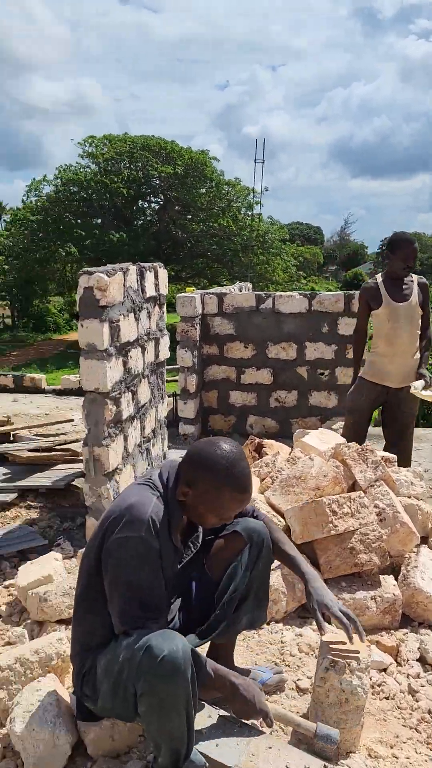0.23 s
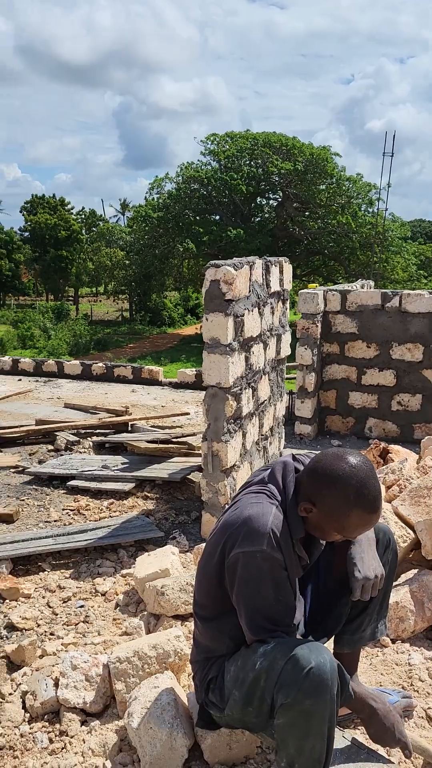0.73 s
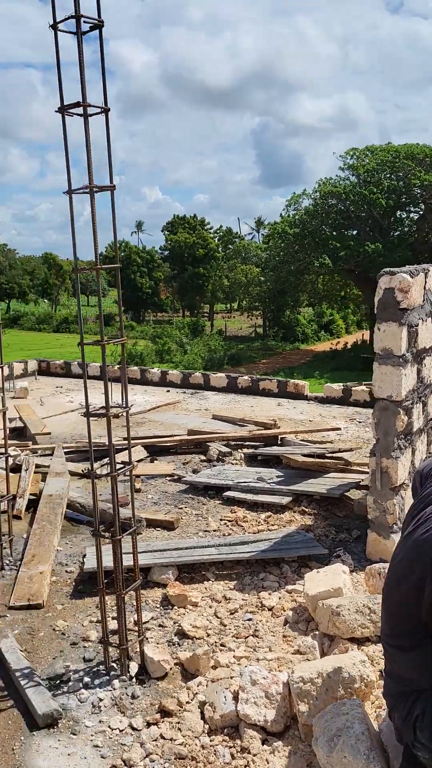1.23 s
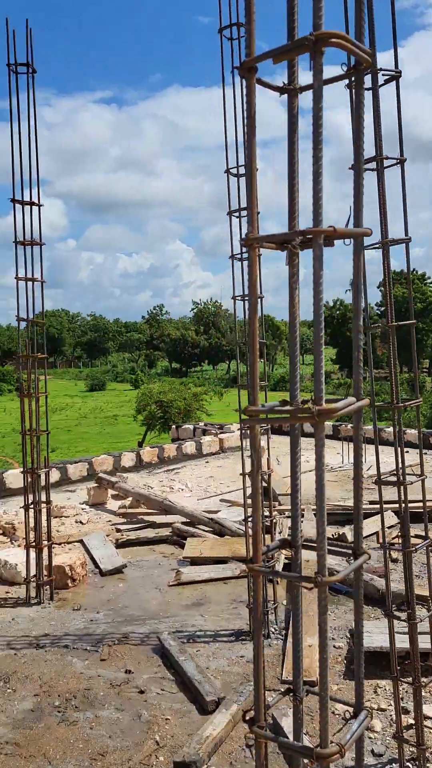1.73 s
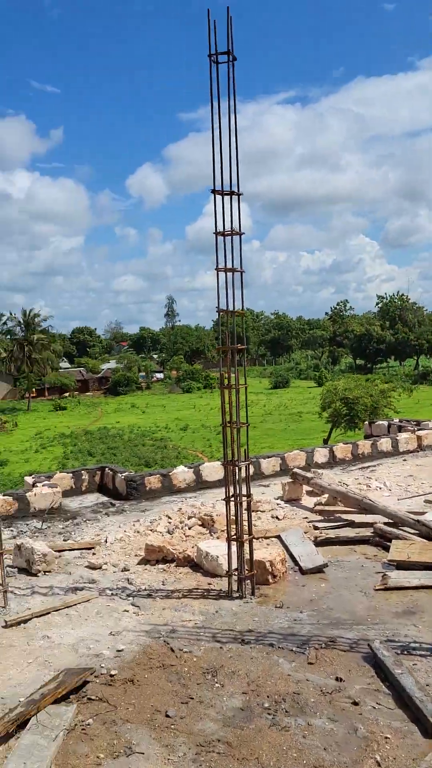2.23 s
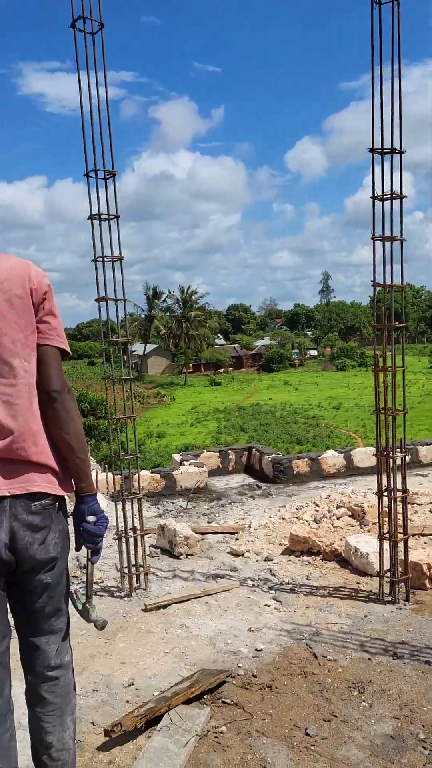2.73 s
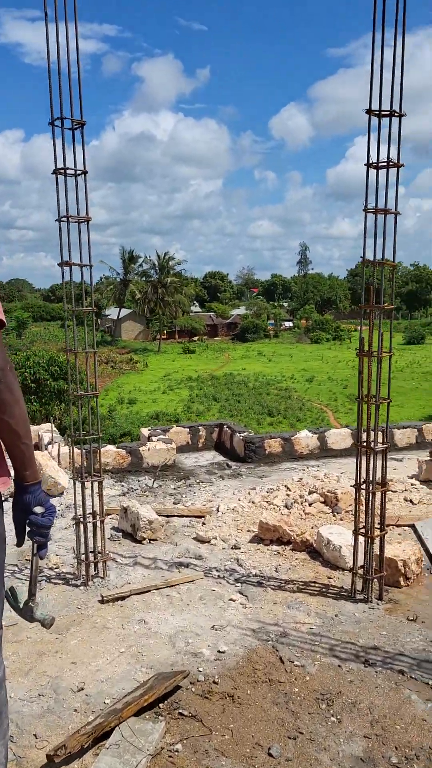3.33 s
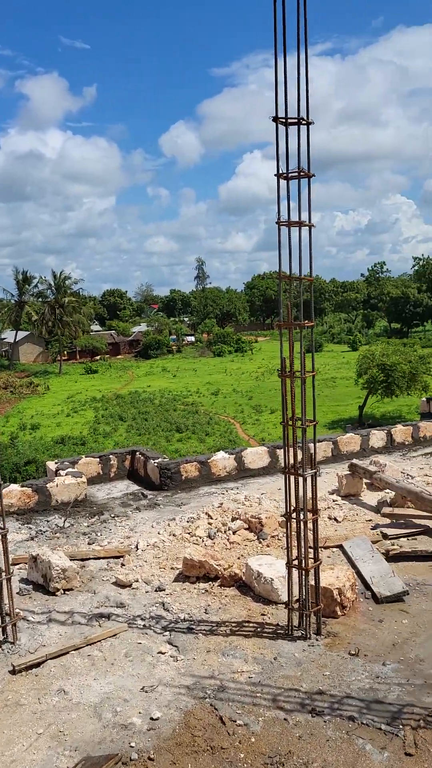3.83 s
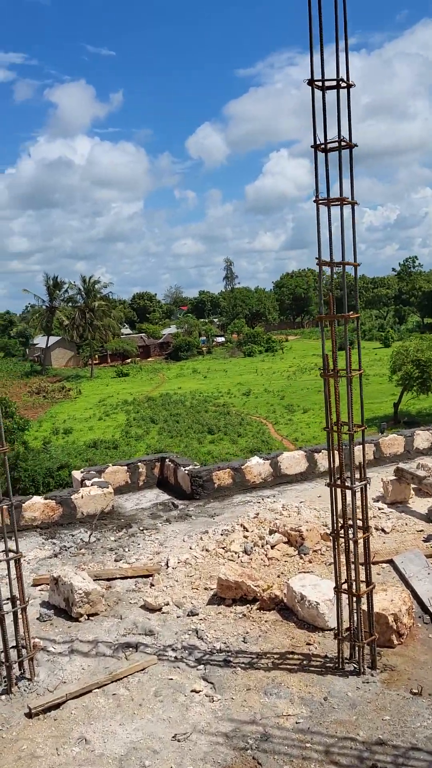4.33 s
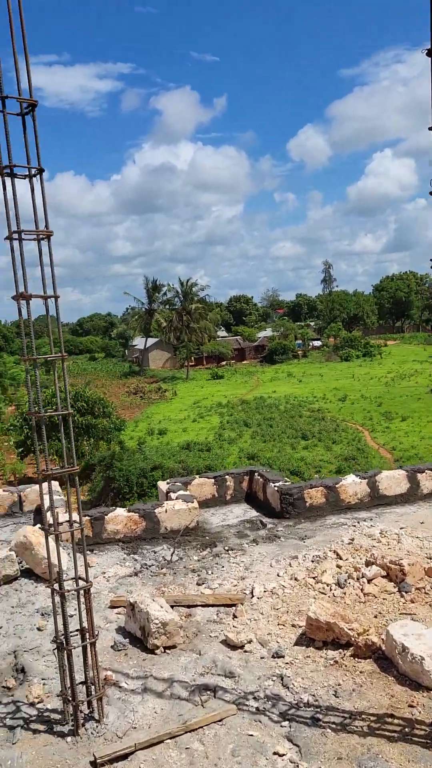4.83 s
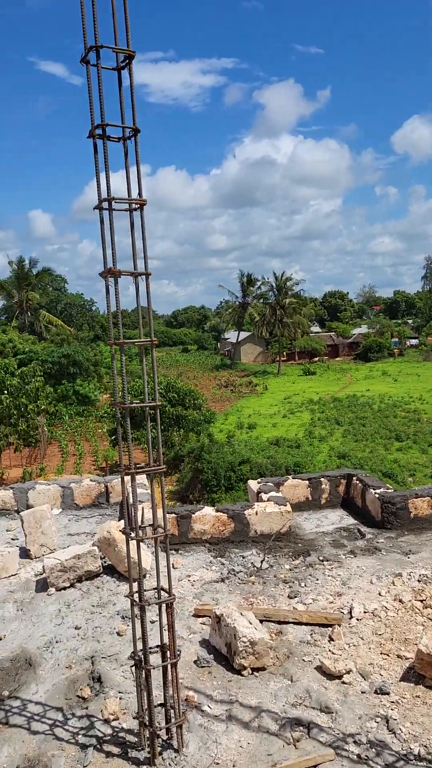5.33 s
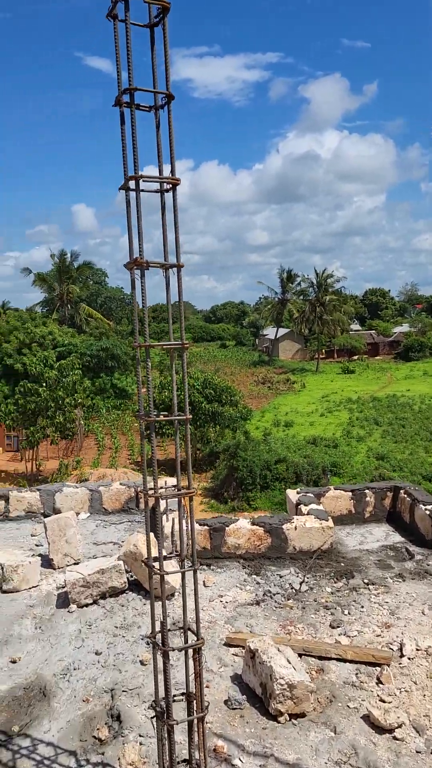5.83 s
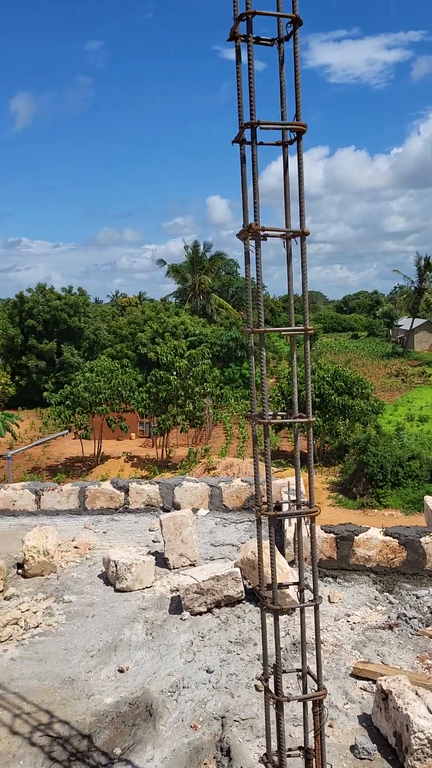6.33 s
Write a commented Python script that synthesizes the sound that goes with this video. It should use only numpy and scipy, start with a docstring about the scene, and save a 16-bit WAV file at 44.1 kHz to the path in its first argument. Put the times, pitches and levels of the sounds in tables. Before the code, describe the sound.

At an open-air building site, heard close and dry through a handheld stereo microphone, a steel clink at 0.1 s joins a hoarse blade rasp over gritty concrete. The scrape weakens, then catches sharply at 0.45 s and squeals in thin, wavering high tones that fade by about 1.4 s. Low handling bumps swell toward 1.75 s, where steel grazes the block with a thud; a hard, woody-hollow clatter of knocks follows at 2.0 s. Steady hammer blows land at about 2.46, 3.07, 3.72, 4.34, 5.53 and 6.13 s: bright cracks or duller clacks, crunching stone and a short low thud near 320 Hz. Around 4.9 s the rhythm skips a beat. Between blows, light steel clinks at 2.6, 3.4, 4.0, 4.7 and 5.3 s and tiny chips tick down. Faint rustle and rumble continue; a far rooster barely begins at 6.5 s.

```python
"""A hammer chips a soft stone block on an open building site: noise cracks and crunches, damped
modes ring the block and thud it on the slab, and chips tick down as short resonant noises.
Between blows steel clinks and small knocks tick; early on a steel blade scrapes and squeals over concrete.
The recorder shifts in the hand with low rumble, bumps and flutter, the site rustles, and at the end
a far rooster, made of a few harmonics, starts to crow."""
import sys
import numpy as np
from scipy import signal
from scipy.fft import rfft, irfft
from scipy.io import wavfile
from scipy.ndimage import uniform_filter1d, minimum_filter1d

SR = 44100
rng = np.random.default_rng(int(sys.argv[2]) if len(sys.argv) > 2 else 0)


def dump_mix(stems):
    """Bounce the given channels to the path in sys.argv[1] as a 16-bit WAV at rate SR."""
    frames = np.atleast_2d(stems).T  # one column per channel
    limited = np.clip(frames, -1, 1)  # hard clip at full scale
    pcm = np.round(limited * 32767).astype(np.int16)
    wavfile.write(sys.argv[1], SR, pcm)


N = 290619
TIME_S = np.arange(N) / SR
AGE_S = np.arange(SR // 2) / SR  # time since a hit
HIT_SIZE = len(AGE_S)
PORT_LAG_S = .00031  # the work lies to the right, so the left port hears it later
LOWPASS_HZ = 15900

# Levels in the tables are relative; the sources may add offsets and random spread.
# Recorder shifting in the hand. Each row: time in seconds, rumble level in dB.
HANDLING = [(0, -46), (.7, -46.5), (.92, -60), (1.2, -41.5), (1.5, -44), (1.85, -37.5), (1.95, -49),
            (2.15, -41.5), (2.4, -53), (3.12, -41.5), (3.28, -51.5), (3.62, -59.5), (4.25, -39.5),
            (4.9, -50), (5.15, -65), (5.45, -49.5), (6.2, -56), (6.45, -64.5)]
# Single bumps on top of it. Each row: peak time in seconds, half width in seconds, rumble level in dB.
BUMPS = [(.06, 0.021, -38.5), (1.131, 0.036, -39), (1.475, 0.014, -36.5), (1.584, 0.022, -31),
         (1.681, 0.038, -28.5), (1.75, 0.032, -23), (2.824, 0.028, -33.5), (2.97, 0.033, -39),
         (3.438, 0.045, -46.5), (3.789, 0.052, -42), (5.369, 0.032, -39.5), (6.031, 0.069, -43.5)]
# Spectrum of the handling rumble. Each row: frequency in Hz, level in dB.
RUMBLE_SPECTRUM = [(15, -22.5), (35, -7.5), (62, 3), (110, -2), (200, -15.5), (400, -43.5), (1000, -61)]
# Spectrum of the handling flutter. Each row: frequency in Hz, level in dB.
FLUTTER_SPECTRUM = [(60, -6), (150, -1), (300, 3), (500, -7.5), (900, -22), (2500, -56)]

# Faint rustle of the site. Each row: time in seconds, level in dB.
SITE_LEVEL = [(1.5, -61.5), (1.9, -62), (2.1, -72), (2.42, -55.5), (2.7, -65.5), (3.5, -67), (4.1, -70.5),
              (4.5, -63.5), (5.0, -74), (5.45, -66), (5.8, -73), (6.25, -61.5), (6.59, -71.5)]
# Spectrum of the rustle. Each row: frequency in Hz, level in dB.
SITE_SPECTRUM = [(100, 4.5), (500, 11.5), (1000, 6), (1700, 8.5), (2800, -0.5), (5000, -0.5), (8500, -4.5),
                 (11000, -10), (15000, -11)]

# Far rooster. Each row: time in seconds, fundamental in Hz, level in dB.
CROW = [(6.48, 490, -99.5), (6.515, 472, -58), (6.555, 509.4, -59.5), (6.59, 500, -59)]
# Its throat resonance. Each row: harmonic number, level in dB.
CROW_HARMONICS = [(2, -2), (3, 4), (4, -3)]

# Blade on concrete. Each row: time in seconds, level in dB.
SCRAPE_LEVEL = [(0.0, -28.5), (0.04, -33), (0.182, -40), (0.36, -46), (0.462, -33.5), (0.6, -36.5),
                (0.864, -37), (1.216, -44), (1.35, -43), (1.412, -53), (1.6, -58.5)]
# Spectrum of the scrape. Each row: frequency in Hz, level in dB.
SCRAPE_SPECTRUM = [(300, -21), (600, -16.5), (1200, -18), (2000, 0), (2800, -3.5), (4400, 2), (5500, -3),
                   (8500, -1), (10500, -9), (13000, -4.5), (15000, 5.5), (16000, -5)]
# The blade catches on grit. Each row: start in seconds, level in dB, t60 in seconds.
CATCHES = [(0.432, -20.5, 0.36), (0.465, -20, 0.047), (0.521, -23.5, 0.054), (0.6, -25, 0.21),
           (.992, -33.5, 0.12), (1.319, -34, 0.045)]
# Resonances of the blade taking hold. Each row: peak time in seconds, pitch at the peak in Hz,
# level in dB, t60 in seconds.
SQUEALS = [(.3, 2360, -51, 0.52), (.44, 2730, -38.5, 1), (.45, 3410, -30, 0.77), (.47, 4050, -37, 1.7),
           (.47, 4500, -27, 0.29), (.61, 2455, -30, 0.53), (.63, 4470, -34.5, 0.29), (.64, 3930, -29, 0.22),
           (0.659, 2910, -31, 0.23), (0.759, 3460, -46, 3.3), (0.821, 2543, -36, 1.9), (.9, 3060, -43, 3.9)]
# Bending of the blade. Each row: time in seconds, rise of its resonances in Hz.
BEND = [(.3, 0.5), (.41, 2), (.46, 59.5), (.55, 56), (.62, 99), (.72, 141), (.88, 190.5), (1.03, 130),
        (1.15, 116), (1.35, 21)]
# Lower, hoarse rasp as the blade first drags. Each row: time in seconds, pitch in Hz, level in dB.
RASP = [(0, 1768, -42.5), (.035, 1620, -35.5), (.07, 1297, -40), (.11, 1500, -49.5), (.16, 1665, -38.5),
        (.21, 1590, -50.5)]

# Small knocks and ticks; the rows at 2.465, 4.337 and 6.134 s are the sharp upper-mid snap of hammer blows.
# Each row: start in seconds, level in dB, centre frequency in Hz, t60 in seconds.
KNOCKS = [(0.276, -23, 12800, 0.029), (0.341, -34, 1533, 0.024), (1.158, -33, 8360, 0.015),
          (1.216, -33.5, 8070, 0.01), (1.818, -28, 2000, .04), (1.978, -25.5, 3350, 0.039),
          (1.978, -28, 1060, 0.23), (1.996, -14, 930, 0.032), (2.005, -20.5, 540, 0.12),
          (2.008, -9, 1250, 0.053), (2.023, -20.5, 1080, 0.093), (2.095, -35.5, 1440, 0.012),
          (2.17, -41.5, 1045, 0.2), (2.244, -35, 1180, 0.048), (2.262, -33.5, 800, 0.12),
          (2.3, -36.5, 420, .2), (2.465, -13.5, 3480, 0.037), (2.87, -35.5, 1540, 0.0165),
          (3.778, -28.5, 3300, 0.037), (3.998, -38.5, 1600, 0.042), (4.337, -18, 3500, 0.033),
          (4.476, -38, 1515, 0.018), (6.134, -17, 3200, 0.018)]

# Steel on stone. Each row: start in seconds, contact level in dB, contact t60 in seconds, ring level
# in dB, edge pitch in Hz, edge level in dB, edge t60 in seconds, left minus right in dB.
CLINKS = [(0.082, -14.5, 0.045, -32, 3600, -16.5, 0.087, -6.5), (0.103, -26, 0.1, -43, 1300, -27, .1, 2),
          (1.777, -23, 0.055, -60, 7540, -20.5, 0.082, -6), (1.789, -21.5, 0.018, -60, 7650, -45, .1, -10),
          (2.613, -27.5, 0.14, -36, 4850, -17, 0.15, -3.5),
          (3.361, -26, 0.096, -36.5, 4984, -25.5, 0.1, -2), (4.028, -29.5, 0.063, -58, 7500, -48, .12, -6),
          (4.672, -31.5, 0.073, -51.5, 3450, -30, 0.096, -3),
          (5.329, -34.5, 0.08, -53.5, 3297, -36.5, 0.097, 3), (5.393, -48.5, 0.056, -72, 7500, -59, .1, -7),
          (5.532, -50, 0.038, -58, 4850, -34, 0.074, 0), (5.536, -53, 0.047, -62, 5940, -47.5, 0.26, -14),
          (5.992, -42, 0.16, -61, 4900, -40, 0.15, -6), (6.023, -37.5, 0.095, -60, 7740, -55, .12, 8)]
# Modes of the hammer head. Each row: frequency in Hz, level in dB, t60 in seconds.
STEEL_MODES = [(1863, 6, 0.077), (2590, -5, 0.057), (3460, -23.5, .11), (4960, 0.5, 0.09), (6035, -18, .15),
               (7400, 1, 0.118)]
# Spectrum of gritty contact. Each row: frequency in Hz, level in dB.
CONTACT_SPECTRUM = [(200, -2), (650, 2.5), (1300, 4.5), (3000, -4), (5000, -7), (7500, -2), (11000, -15.5),
                    (15000, -15)]

# Blows and rebounds of the block. Each row: start in seconds, crack level in dB, crunch level in dB,
# thud level in dB, main thud pitch in Hz, thud t60 in seconds, dull clack level in dB.
BLOWS = [(1.778, -23.5, -32, -11.5, 328, 0.105, -21.5), (1.816, -26, -37, -21.5, 349, 0.16, -25),
         (2.464, -13, -21, -9.5, 338.6, 0.15, -17.5), (3.073, -11.5, -19.5, -12, 318.7, 0.185, -18),
         (3.143, -36.5, -72, -15, 289, 0.12, -35), (3.721, -3, -21, -18.5, 319.7, 0.13, -19),
         (3.778, -42.5, -38, -27.5, 290, 0.28, -30), (4.335, -37, -31.5, -7.5, 318, 0.15, -11),
         (5.532, -29, -30.5, -16.5, 305, 0.21, -23.5), (6.133, -13, -22.5, -12, 314.2, 0.28, -13.5),
         (6.24, -58, -56.5, -25, 319, 0.145, -48)]
# Block rocking on the slab. Each row: pitch as a ratio to the main thud pitch, level in dB.
THUD_MODES = [(0.58, -15.5), (0.742, -7), (0.881, -8), (1.001, -1), (1.15, -4), (1.293, -11.5)]
# Ringing of the stone block. Each row: frequency in Hz, level in dB, t60 in seconds.
STONE_MODES = [(417.7, -1.5, 0.24), (477.5, -8.5, 0.24), (616, -4, 0.032), (772, -5, 0.17),
               (830, -11, 0.21), (973, -4, 0.087), (1057, 0, 0.11), (1256, -1.5, 0.12), (1570, -9.5, .1),
               (2120, -4, .05), (3110, -5, 0.015), (3333, 1.5, 0.016), (4530, -5.5, 0.025),
               (5280, -11, 0.029), (7270, -19, 0.013)]
# Spectrum of the hard crack. Each row: frequency in Hz, level in dB.
CRACK_SPECTRUM = [(300, -14.5), (1000, -5.5), (2000, -5), (3200, -4.5), (5500, 0), (8000, -8),
                  (11000, -16.5), (15000, -16.5)]
# Spectrum of crunching stone. Each row: frequency in Hz, level in dB.
CRUNCH_SPECTRUM = [(300, -13), (1000, -2), (2000, 7), (3500, 3.5), (6000, -1.5), (8000, -8), (11000, -13.5),
                   (15000, -12.5)]
# Spectrum of the dull clack. Each row: frequency in Hz, level in dB.
CLACK_SPECTRUM = [(25, -26.5), (60, -12.5), (150, -7.5), (260, -0.5), (450, 2.5), (620, -2.5),
                  (1050, -10.5), (1500, -13.5), (2500, -33), (5000, -52.5)]


def undb(db):
    """Decibels to gain."""
    return 10 ** (np.asarray(db) / 20)


def curves(table):
    """The columns of a table, joined by straight lines in time."""
    time_s, *columns = np.transpose(table)
    return [np.interp(TIME_S, time_s, column) for column in columns]


def colour(x, spectrum):
    """Give x a spectrum of (Hz, dB) points and unit rms."""
    hz, db = np.transpose(spectrum)
    size = x.shape[-1]
    bin_hz = np.maximum(np.fft.rfftfreq(size, 1 / SR), 1)
    gain = undb(np.interp(np.log(bin_hz), np.log(hz), db))
    y = irfft(rfft(x) * gain, size)
    return y / np.std(y)


def walk(rate_hz, size):
    """Smooth random wander: rate_hz new values a second, spread just under 1."""
    hold = max(int(SR / rate_hz), 1)
    steps = np.repeat(rng.standard_normal(size // hold + 1), hold)
    return uniform_filter1d(steps, hold)[:size]


def ports(x, lag_s=PORT_LAG_S, pan_db=0):
    """One sound at two microphone ports: the left delayed, pan_db the level of left over right."""
    i = np.arange(len(x))
    late = np.interp(i - np.round(lag_s * SR), i, x, left=0)
    return np.array([late * undb(pan_db / 2), x * undb(-pan_db / 2)])


def noise(spectrum, size, diffuse, grain_db=0, pan_db=0):
    """Coloured stereo noise, part direct and part from all sides, gathered into grains."""
    direct = ports(rng.standard_normal(size), pan_db=pan_db)
    grains = undb(grain_db * walk(1500, size))
    ambient = diffuse * rng.standard_normal((2, size))
    return colour((direct + ambient) * grains, spectrum)


def fade(t60_s, rise_s):
    """Envelope of a hit: builds up over rise_s, then dies away; peak 1."""
    rise = 1 - np.exp(-(AGE_S / rise_s) ** 2)
    envelope = rise * np.exp(-np.log(1000) * AGE_S / t60_s)
    return envelope / envelope.max()


def add(out, start_s, sound):
    """Mix a sound in at start_s."""
    i = max(int(start_s * SR), 0)
    out[:, i:i + sound.shape[1]] += sound[:, :N - i]


def ringing(modes, rise_s):
    """Struck modes of (Hz, dB, t60 s); each hit varies their pitch and level a little and gives each a random
    phase."""
    out = 0
    for hz, db, t60_s in modes:
        detune, size, turn = rng.standard_normal(3)
        tone = np.sin(2 * np.pi * (hz * (1 + 0.0036 * detune) * AGE_S + turn))
        out = out + undb(db + 2 * size) * tone * fade(t60_s, rise_s)
    return out


def handling():
    """The recorder shifts in the hand: low rumble with bumps; the bumps carry far more flutter."""
    shifting = undb(curves(HANDLING)[0]) * undb(5 * walk(16, N))
    bumps = sum(undb(db) * np.exp(-((TIME_S - peak_s) / width_s) ** 2) for peak_s, width_s, db in BUMPS)
    rumble = noise(RUMBLE_SPECTRUM, N, diffuse=2) * np.hypot(shifting, bumps)
    rumble = rumble * undb(2.5) * undb([[-1.2], [1.2]])  # right port louder
    flutter_gain = np.hypot(undb(-12.5) * shifting, undb(-4) * bumps) * undb(2.5 * walk(30, N))
    return rumble + noise(FLUTTER_SPECTRUM, N, diffuse=0.2) * flutter_gain


def site():
    """Diffuse noise rustles; random clicks through a resonance make single crumbs of grit."""
    level_db, = curves(SITE_LEVEL)
    rustle_gain = undb(level_db + 9.5 + 2 * walk(30, N))
    rustle = noise(SITE_SPECTRUM, N, diffuse=19, grain_db=3.5) * rustle_gain
    clicks = (rng.random(N) < 35 / SR) * rng.standard_normal(N)  # about 35 crumbs a second
    crumb_spectrum = [(500, -12.0), (1200, 4.5), (1800, 6.5), (2800, -11.5), (6000, -15.5), (12000, -13)]
    crumbs = colour(ports(clicks), crumb_spectrum) * undb(level_db + 1)
    return rustle + crumbs


def rooster():
    """A far, slightly hoarse crow: only the harmonics near the throat resonance carry."""
    hz, db = curves(CROW)
    hoarse_hz = hz * (1 + 0.0239 * walk(260, N))
    phase = 2 * np.pi * np.cumsum(hoarse_hz) / SR
    voice = sum(undb(harmonic_db) * np.sin(round(k) * phase) for k, harmonic_db in CROW_HARMONICS)
    return ports(voice * undb(db) * (TIME_S > CROW[0][0]), lag_s=0)


def flexing(x, count):
    """Echoes across the bending blade comb a sound into many weak, drifting peaks."""
    i, out = np.arange(N), x
    for lag_s in rng.uniform(0.00059, .005, count):
        lag = lag_s * SR * (1 + 0.048 * walk(11.0, N))
        echo = np.array([np.interp(i - lag, i, channel) for channel in x])
        out = out + 0.2 * echo
    return out / np.std(out)


def squeal(hz, db, waver, rate_hz):
    """A friction tone; grains renew it rate_hz times a second, and the grip comes and goes."""
    grains = walk(rate_hz, N) + 1j * walk(rate_hz, N)
    drive = (1 + waver * grains) / np.hypot(1, waver)
    phase = 2 * np.pi * np.cumsum(hz * (1 + .004 * walk(40.95, N))) / SR
    grip_db = 2 * walk(25, N) - 1
    tone = np.real(drive * np.exp(1j * phase)) * undb(db + grip_db)
    return ports(tone, lag_s=.00005, pan_db=-1.0)


def squeals():
    """Each squeal swells and dies away while the bend of the blade carries its pitch."""
    bend_hz, = curves(BEND)
    out = 0
    for peak_s, hz, db, t60_s in SQUEALS:
        since_peak_s = TIME_S - peak_s
        swell_db = 305 * since_peak_s  # dB per second
        decay_db = -60 * since_peak_s / t60_s
        pitch_hz = hz + bend_hz - np.interp(peak_s, TIME_S, bend_hz)
        out = out + squeal(pitch_hz, db + np.minimum(swell_db, decay_db), waver=0.8, rate_hz=90)
    return out


def blade():
    """A blade grinds over sandy concrete: combed hiss, sand, catches, gliding squeals and a rasp."""
    level_db, = curves(SCRAPE_LEVEL)
    on_ground = np.interp(TIME_S, [1.35, 1.65], [1, 0])
    grit_db = 2 * walk(110, N) + 3 * walk(900, N)
    scrape = noise(SCRAPE_SPECTRUM, N, diffuse=1.0, pan_db=-14.5)
    hiss = flexing(scrape, count=4) * undb(grit_db)
    sand = noise(CONTACT_SPECTRUM, N, diffuse=0.13, grain_db=3.5, pan_db=-4)
    out = (hiss + undb(-12.5) * sand) * undb(level_db - 4.0) * on_ground
    for start_s, db, t60_s in CATCHES:
        catch = noise(SCRAPE_SPECTRUM, HIT_SIZE, diffuse=1.0, grain_db=1.5, pan_db=-10.0)
        add(out, start_s, undb(db) * catch * fade(t60_s, rise_s=0.00037))
    pressed = np.interp(TIME_S, [1.32, 1.4], [1, 0])
    dragging = np.interp(TIME_S, [.2, .22], [1, 0])
    rasp = squeal(*curves(RASP), waver=8, rate_hz=700)
    return out + pressed * squeals() + dragging * rasp


def knock(hz, t60_s):
    """Noise through one broad resonance that is quickly damped."""
    body = [(hz / 6, -22), (hz / 2.76, -11), (hz / 1.22, 0), (hz * 1.4, 0), (hz * 1.603, -16), (hz * 8, -38)]
    return noise(body, HIT_SIZE, diffuse=1.0) * fade(t60_s, rise_s=0.00056)


def knocks():
    """Small knocks and ticks, and the upper-mid snap of some blows, each a burst of resonant noise."""
    out = np.zeros((2, N))
    for start_s, db, hz, t60_s in KNOCKS:
        add(out, start_s, undb(db) * knock(hz, t60_s))
    return out


def falling_chips(count):
    """Every blow throws a few chips of differing size that tick on the slab one by one."""
    out = np.zeros((2, N))
    for blow_s, *_ in BLOWS:
        for flight_s in rng.uniform(.1, .48, count):
            weight, pitch = rng.standard_normal(2)
            land_s = blow_s + flight_s
            if land_s < TIME_S[-1]:
                chip_db, chip_hz = -46 + 4 * weight, 1620 * 2 ** (.2 * pitch)
                add(out, land_s, undb(chip_db) * knock(chip_hz, t60_s=0.021))
    return out


def clinks():
    """Steel grazes the stone: gritty contact, a ringing hammer head, and narrow noise from the struck edge."""
    out = np.zeros((2, N))
    for start_s, db, t60_s, ring_db, edge_hz, edge_db, edge_t60_s, pan_db in CLINKS:
        contact = noise(CONTACT_SPECTRUM, HIT_SIZE, diffuse=1.0, grain_db=3.0, pan_db=pan_db)
        contact = contact * fade(t60_s, rise_s=0.0017)
        head = undb(ring_db - 3.5) * ringing(STEEL_MODES, rise_s=0.028)
        resonance = [(edge_hz / 1.2, -35), (edge_hz / 1.025, -14), (edge_hz, 0),
                     (edge_hz * 1.04, -14), (edge_hz * 1.25, -40)]
        edge = noise(resonance, HIT_SIZE, diffuse=1.0, pan_db=pan_db) * fade(edge_t60_s, rise_s=0.0006)
        add(out, start_s, undb(db) * contact + undb(edge_db - 3.5) * edge)
        add(out, start_s, ports(head, lag_s=.00007, pan_db=pan_db))
    return out


def thud(hz, t60_s):
    """The block rocks on the slab: close low modes that build up over a few cycles, mixed anew by each blow."""
    ring = 0
    for ratio, db in THUD_MODES:
        detune, size, turn = rng.standard_normal(3)
        mode_hz = hz * ratio * (1 + 0.012 * detune)
        ring = ring + undb(db + size) * np.sin(2 * np.pi * (mode_hz * AGE_S + turn))
    shape = fade(t60_s, rise_s=0.015)
    # the strength of the blow sets the energy, however the modes share it
    return ports(ring * shape * np.std(shape) / np.std(ring * shape), pan_db=-0.4)


def hammer():
    """Each blow: a hard crack, stone crunching and ringing, a dull clack, the thud, and chips raining down."""
    out = np.zeros((2, N))
    low_modes = [mode for mode in STONE_MODES if mode[0] < 2000]
    high_modes = [mode for mode in STONE_MODES if mode[0] >= 2000]
    for start_s, crack_db, crunch_db, thud_db, thud_hz, thud_t60_s, clack_db in BLOWS:
        crack = noise(CRACK_SPECTRUM, HIT_SIZE, diffuse=1.0, pan_db=-7) * fade(0.026, rise_s=0.00054)
        crunch = noise(CRUNCH_SPECTRUM, HIT_SIZE, diffuse=1.0, grain_db=-1.5, pan_db=-1)
        crunch = crunch * fade(0.12, rise_s=0.0016)
        clack = noise(CLACK_SPECTRUM, HIT_SIZE, diffuse=0.87, pan_db=0.5) * fade(0.19, rise_s=0.0077)
        chips = noise(CRUNCH_SPECTRUM, HIT_SIZE, diffuse=.6, grain_db=14.5) * fade(0.3, rise_s=.04)
        # the weight of the blow rings the low modes; only a hard contact reaches the high ones
        body = ports(ringing(low_modes, rise_s=0.00066), pan_db=-2.0)
        clink = ports(ringing(high_modes, rise_s=0.0012), pan_db=-7.5)
        add(out, start_s, undb(crack_db) * (crack + undb(-10.0) * clink))
        add(out, start_s, undb(crunch_db) * (crunch + undb(-31.5) * chips))
        add(out, start_s, undb(clack_db) * (undb(1) * clack + undb(-3) * body))
        add(out, start_s, undb(thud_db) * thud(thud_hz, thud_t60_s))
    return out


def scene():
    """All sources in the open air, and the handling of the recorder."""
    background = handling() + site() + rooster()
    loose = blade() + knocks() + falling_chips(count=2)
    return background + loose + clinks() + hammer()


def record(dry):
    """A limiter turns down peaks above 0.94 in both channels alike; a steep low-pass cuts the top."""
    over = np.maximum(np.abs(dry).max(axis=0) / 0.94, 1)
    gain = uniform_filter1d(minimum_filter1d(1 / over, size=130), size=130)
    lowpass = signal.ellip(10, .2, 80, LOWPASS_HZ, fs=SR, output="sos")
    return signal.sosfilt(lowpass, dry * gain)


dry = scene()
out = record(dry)
dump_mix(out)
```